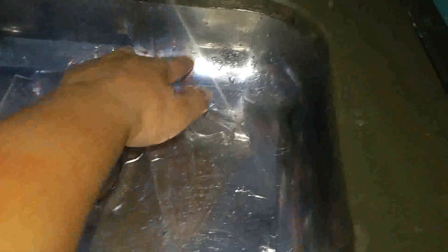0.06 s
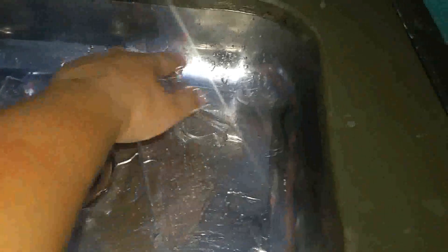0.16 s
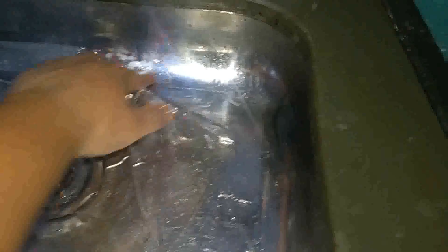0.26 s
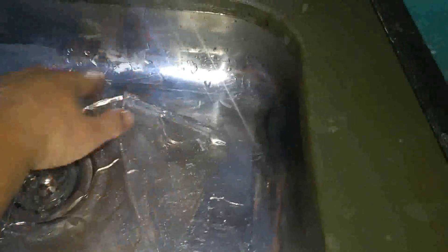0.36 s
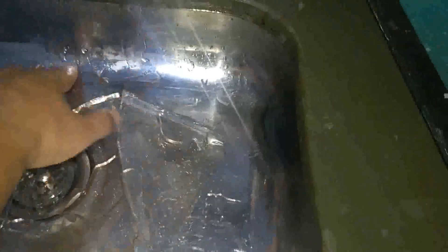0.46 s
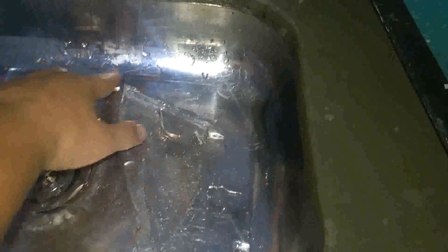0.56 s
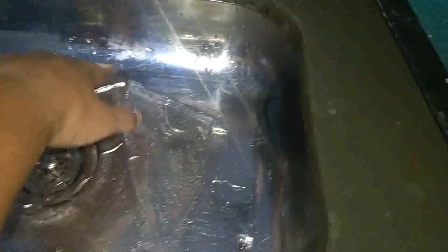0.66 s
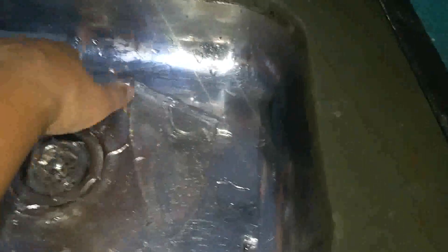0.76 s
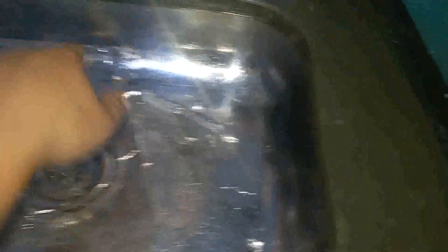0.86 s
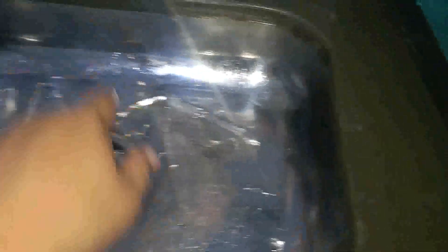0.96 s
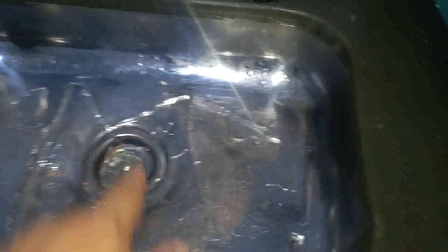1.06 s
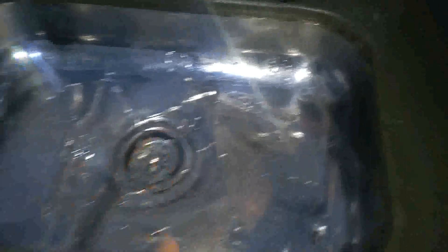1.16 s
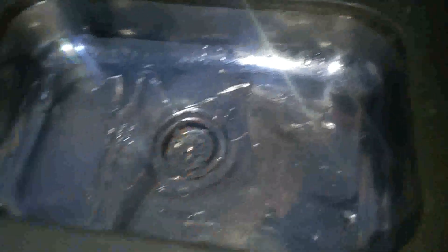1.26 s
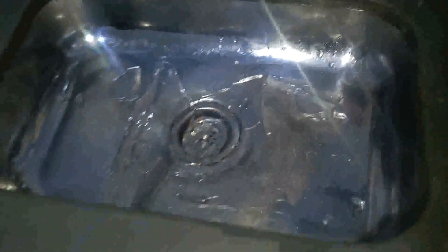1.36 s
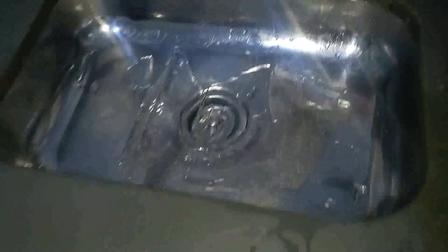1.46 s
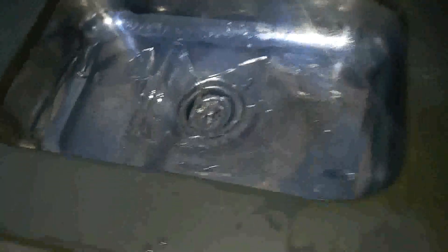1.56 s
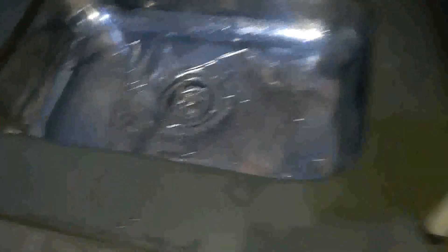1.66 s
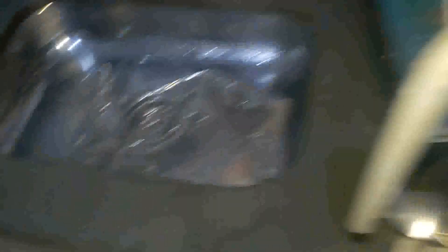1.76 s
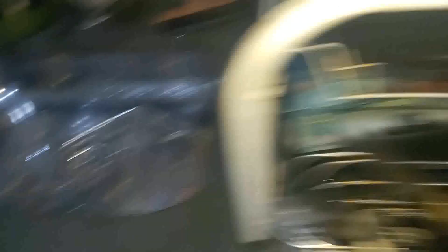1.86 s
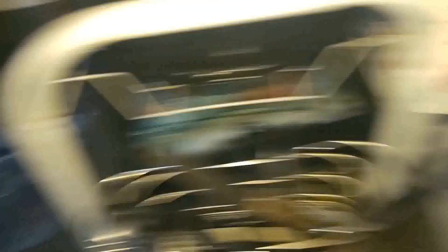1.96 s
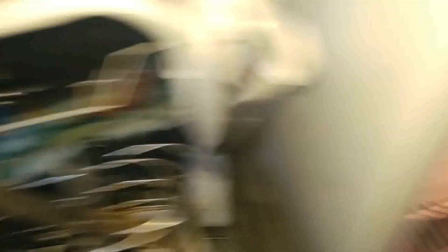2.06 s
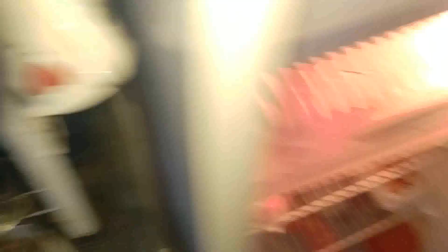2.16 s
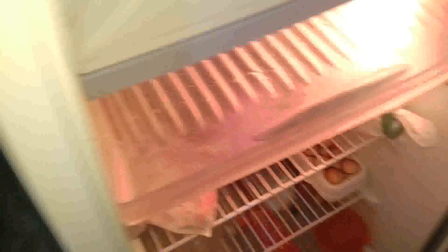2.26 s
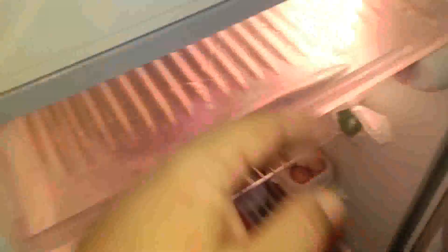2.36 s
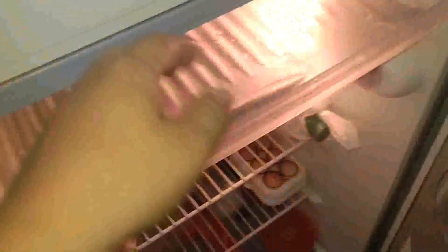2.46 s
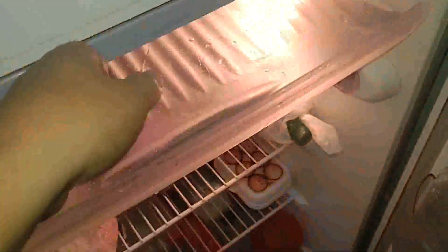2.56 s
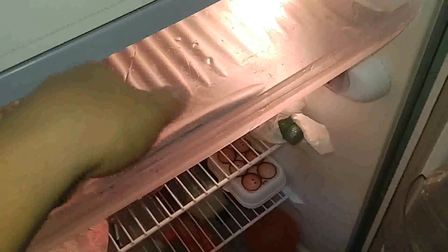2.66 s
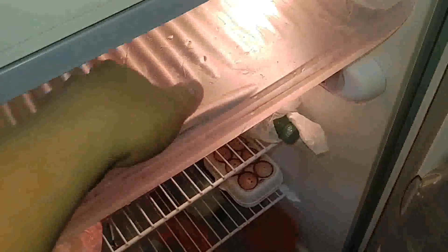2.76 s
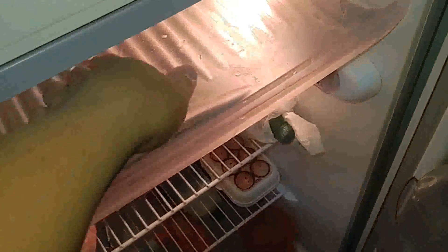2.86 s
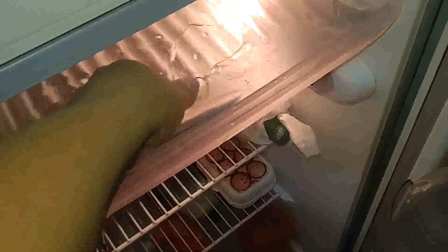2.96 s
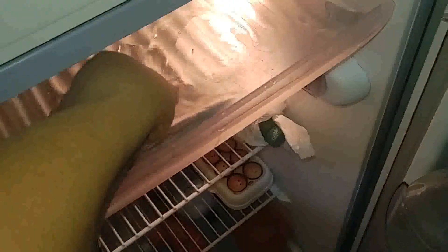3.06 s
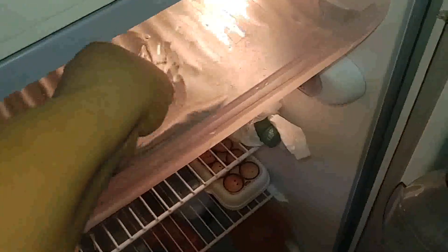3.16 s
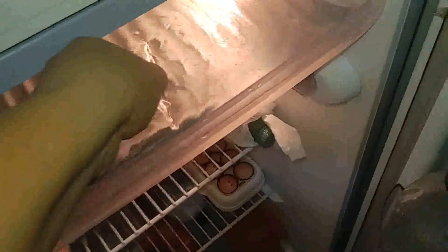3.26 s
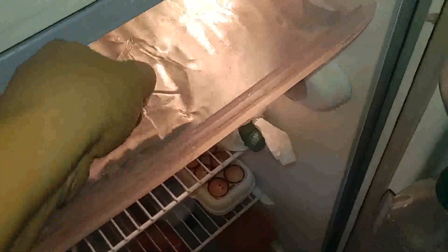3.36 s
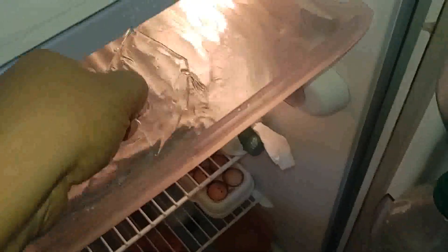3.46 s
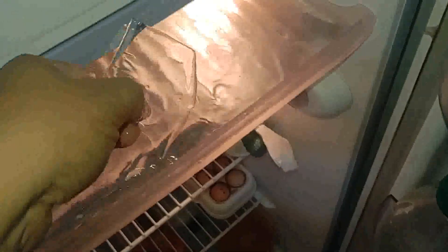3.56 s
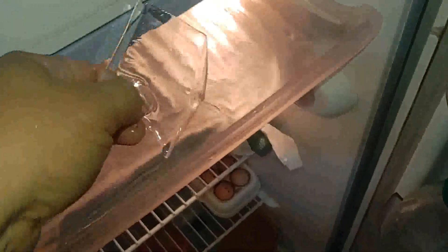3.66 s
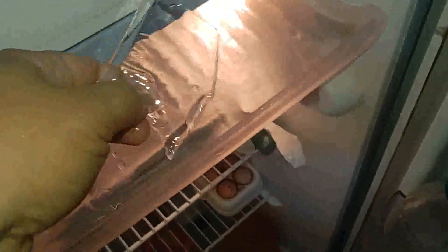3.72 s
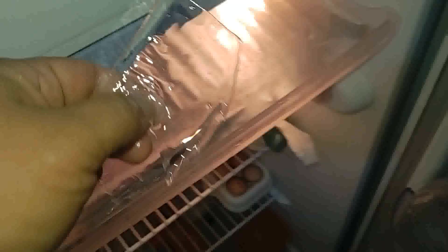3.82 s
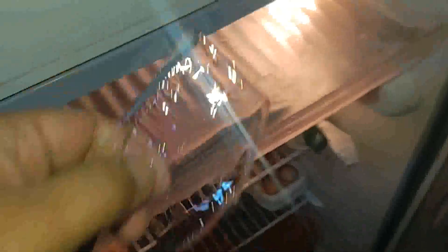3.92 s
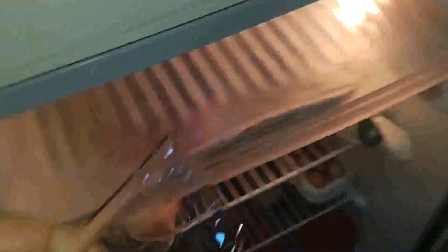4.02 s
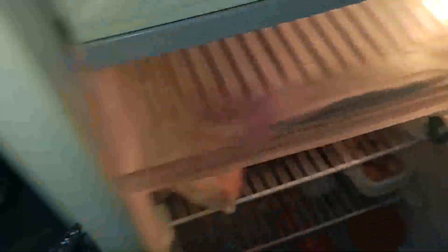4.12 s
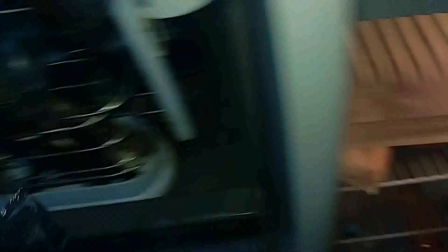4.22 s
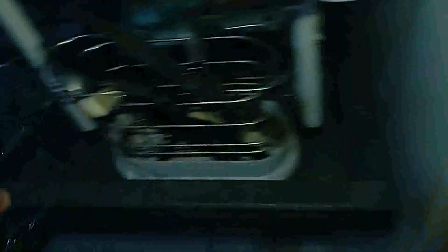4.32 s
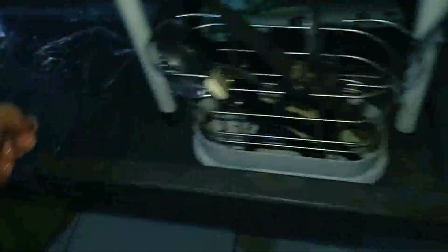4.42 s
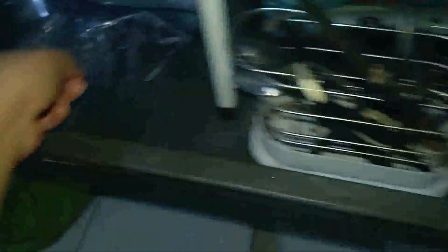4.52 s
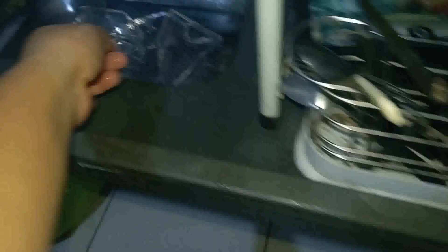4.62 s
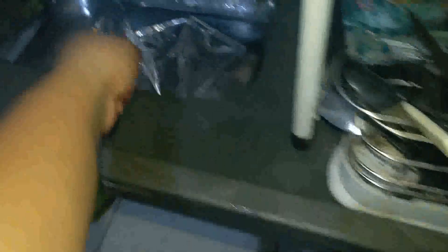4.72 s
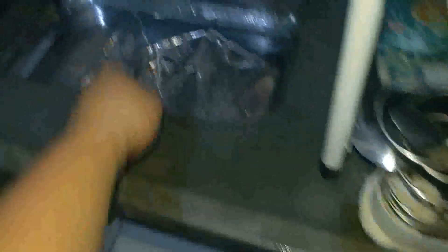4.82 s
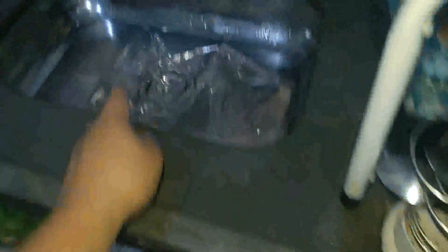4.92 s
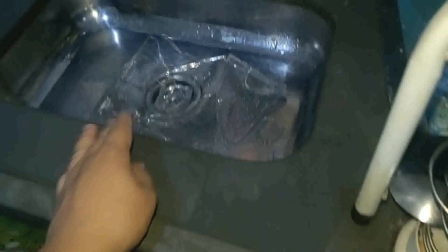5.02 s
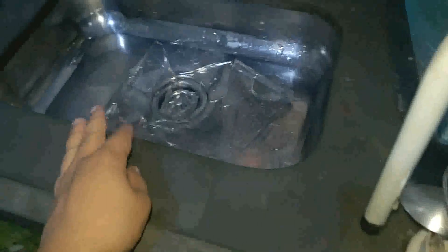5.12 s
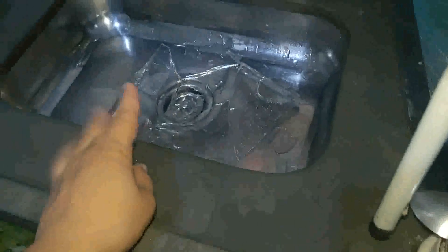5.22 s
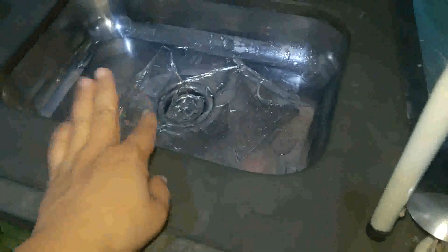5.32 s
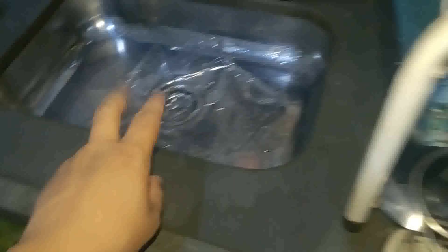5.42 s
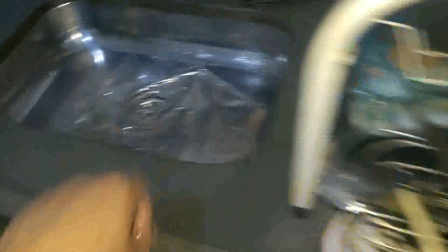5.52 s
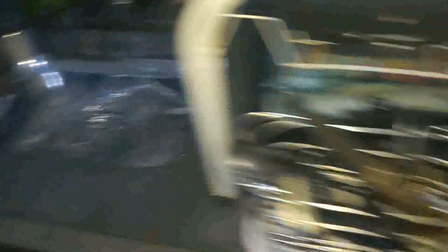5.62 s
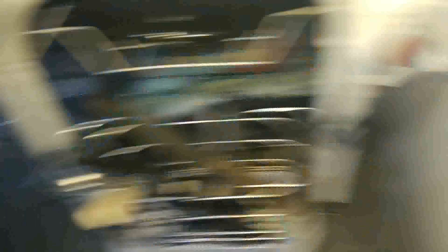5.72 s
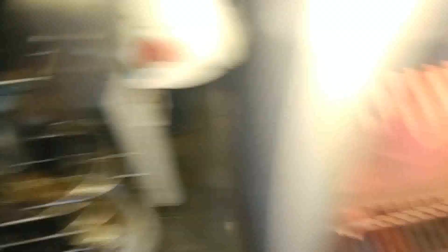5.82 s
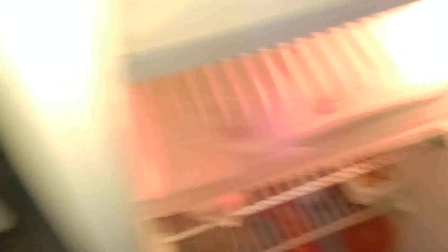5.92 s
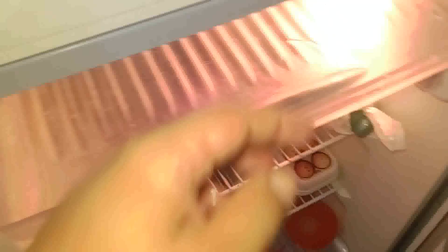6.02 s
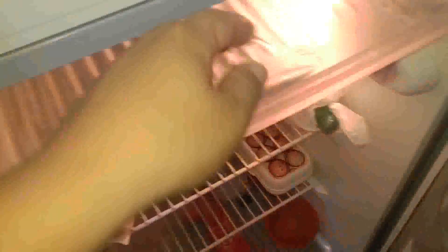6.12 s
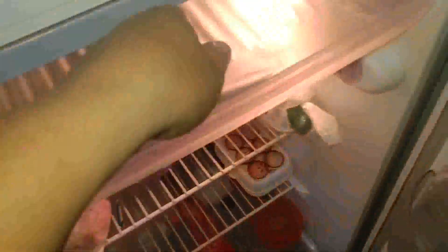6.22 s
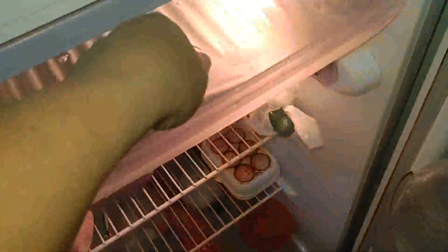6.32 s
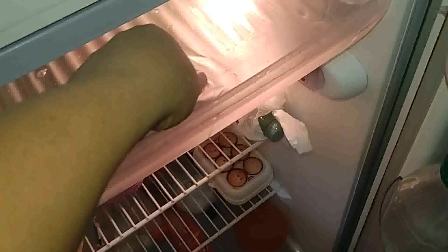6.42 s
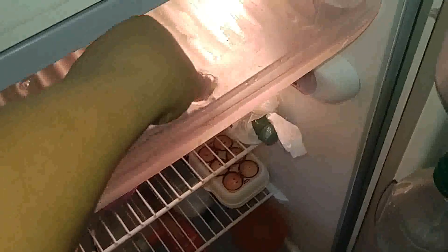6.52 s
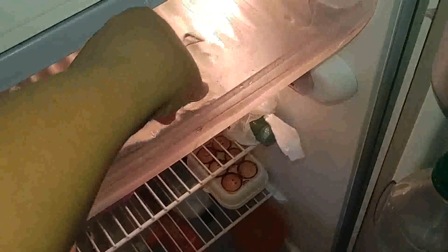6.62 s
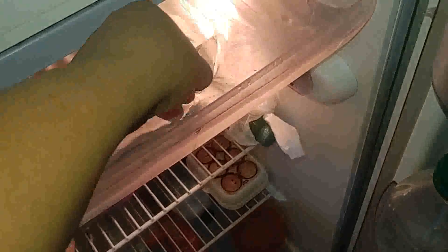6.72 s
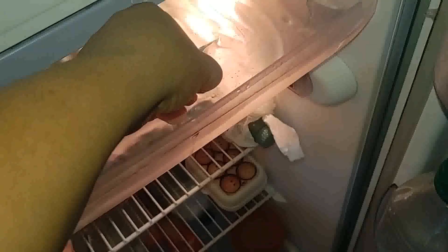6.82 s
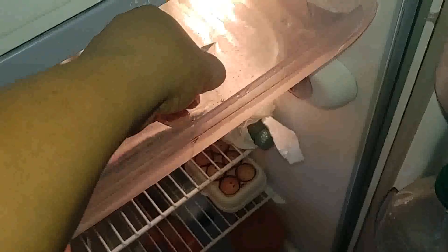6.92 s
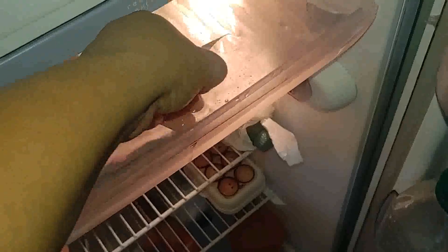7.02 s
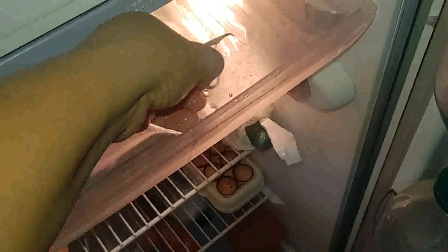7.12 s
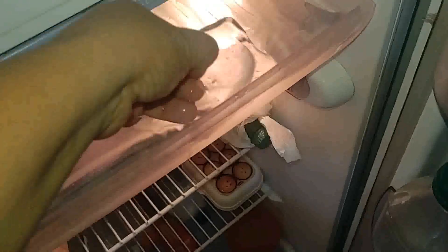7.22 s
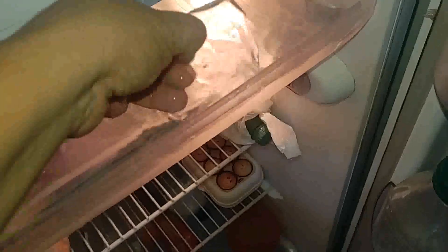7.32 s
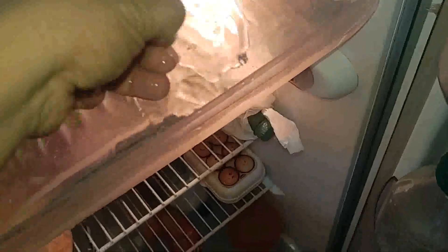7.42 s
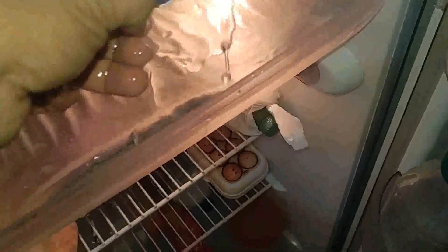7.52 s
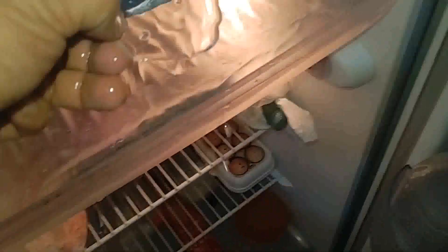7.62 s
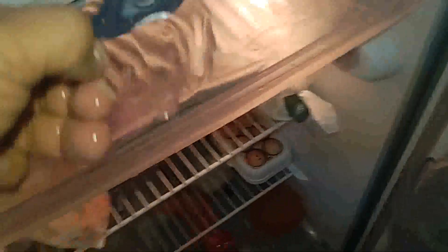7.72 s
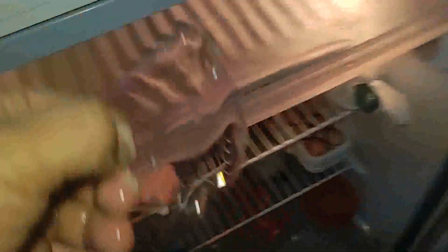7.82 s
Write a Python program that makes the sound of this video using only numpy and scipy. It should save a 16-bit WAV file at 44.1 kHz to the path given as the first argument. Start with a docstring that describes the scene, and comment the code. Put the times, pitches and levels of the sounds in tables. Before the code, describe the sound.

Close stereo pickup in a quiet kitchen with a faint refrigerator hum. Low thumps and short moans of ice in a metal basin, near silence, then small ticks, a hard snap and hollow knocks on a plastic tray. A sheet of ice smashes into the steel sink and skitters in pieces. Later a second sheet grinds over ribs with a squeal and scrapes out loudly, brighter toward the right.

```python
"""Sheets of ice are cleared by hand from a plastic freezer tray beside a steel sink in a small kitchen. Ice is
nudged about in the sink; a sheet cracks loose, lands there and shatters: decaying modes plus dense noise. A
second sheet is pried up and dragged out, its stick-slip noise growing louder and brighter with speed. Short
sagging tones give groans, thumps, throbs and low ringing; wet ice squeals as rough gliding tones. A
refrigerator hums as wavering sines over a thin hiss and a low rumble that swells at the start and end."""
import sys
import numpy as np
from scipy import signal
from scipy.fft import rfft, irfft, next_fast_len
from scipy.io import wavfile
from scipy.ndimage import map_coordinates

SR = 44100
rng = np.random.default_rng(int(sys.argv[2]) if len(sys.argv) > 2 else 0)


def bounce(signal):
    """Save signal as a 16-bit WAV file at the path given by the first command-line argument."""
    frames = np.transpose(np.atleast_2d(signal))
    limited = np.clip(frames, -1, 1)
    pcm = np.round(limited * 32767).astype(np.int16)
    wavfile.write(sys.argv[1], SR, pcm)


N = 347508


def amp(db):
    """Level definition: decibels become an amplitude ratio."""
    return 10 ** (np.asarray(db) / 20)


def evened(x):
    """Power normalisation: each channel is scaled to rms 1."""
    return x / np.sqrt(np.mean(x ** 2, axis=-1, keepdims=True) + 1e-20)


def read(points, hz):
    """Logarithmic frequency scale: a curve is interpolated along log f."""
    f, value = np.transpose(points)
    return np.interp(np.log(hz + 1), np.log(f), value)


def add(mix, s, sound):
    """Superposition: a stereo sound is summed in at time s, or at the start if s is negative."""
    part = mix[:, max(round(s * SR), 0):][:, :sound.shape[1]]
    part += sound[:, :part.shape[1]]


def drift(rate_hz):
    """Random fluctuation: straight lines join normal random values drawn rate_hz times a second."""
    knots = rng.standard_normal(2048)
    return np.interp(np.arange(N) / SR * rate_hz, np.arange(len(knots)), knots)


def swell(s, width_s):
    """Gaussian envelope: a smooth rise and fall around time s."""
    return np.exp(-((np.arange(N) / SR - s) / width_s) ** 2)


# likeness of the sound at the two microphones [f/Hz, correlation from -1 to 1; below 0 is read as 0]
LIKENESS = [(150, 1), (230, 0.8), (330, 0.87), (640, 0.5), (1400, -0.09), (3000, 0.0846), (12000, 0)]


def coloured(pair, spectrum):
    """Spectral shaping and coherence: two unrelated signals get one spectrum and a set likeness."""
    size = next_fast_len(pair.shape[1])
    hz = np.fft.rfftfreq(size, 1 / SR)
    first, second = rfft(pair, size)
    same = np.clip(read(LIKENESS, hz), 0, 1)
    right = same * first + np.sqrt(1 - same ** 2) * second
    shaped = np.array([first, right]) * amp(read(spectrum, hz))
    return evened(irfft(shaped, size)[:, :pair.shape[1]])


def struck(modes, rise_s):
    """Modal decay: each mode is a dying sine; the higher ones reach the two microphones out of step."""
    t = np.arange(SR * 3 // 4) / SR
    out = np.zeros((2, len(t)))
    for hz, db, t60 in modes:
        phase_gap = np.arccos(np.clip(read(LIKENESS, hz), 0, 1)) * np.array([[0], [1]])
        out += amp(db - 60 * t / t60) * np.sin(2 * np.pi * (hz * t + rng.random()) + phase_gap)
    return out * (1 - np.exp(-(t / rise_s) ** 2))


def slips(per_s, spread_db):
    """Stick-slip friction: grains of uneven size, each scattered by the surfaces around it."""
    size = amp(spread_db * np.minimum(rng.exponential(1, N), 3))
    size *= rng.random(N) < per_s / SR
    grains = size * rng.choice([-1, 1], N)
    t = np.arange(SR // 15) / SR
    scatter = rng.standard_normal((2, len(t))) * (np.exp(-t / 0.00041) + 0.26 * np.exp(-t / 0.013))
    return signal.oaconvolve(grains[None], scatter, axes=1)[:, :N]


def bent(pair, ratio):
    """Variable-rate reading: a changing ratio, taken relative to its mean, shifts all resonances."""
    at = np.cumsum(ratio / ratio.mean())
    return np.array([map_coordinates(x, [at], order=3, mode="mirror") for x in pair])


# partials of the refrigerator hum [f/Hz, level/dB before a lift of 3 dB]
HUM_PARTIALS = [(118.4, -69.5), (296.1, -72), (355.3, -80.5), (532.9, -85), (602.9, -83)]
# steady noise of the kitchen [f/Hz, relative level per Hz/dB]
AIR_SPECTRUM = [(25, -34.5), (60, -8.5), (120, -6.5), (200, -8.5), (330, -8), (450, -11.5), (600, -14.5),
                (900, -20), (1300, -21), (1800, -18), (2700, -19), (4200, -25), (6000, -22), (11000, -28.5),
                (15500, -36.5)]
# the low rumble [t/s, level/dB]
RUMBLE_LEVEL = [(0, -57), (1, -67.5), (6.5, -67.5), (7.1, -64.5), (7.88, -56.5)]
HISS_DB = -63


def kitchen():
    """Tonal and broadband noise: the compressor's wavering partials over a low rumble and a thin hiss."""
    t = np.arange(N) / SR
    hum = np.zeros(N)
    for hz, db in HUM_PARTIALS:
        level = amp(db + 3.0 + 0.88 * drift(3.7)) * np.sqrt(2)
        hum += level * np.sin(2 * np.pi * hz * t + 0.28 * drift(3.02))
    air = coloured(rng.standard_normal((2, N)), AIR_SPECTRUM)
    low = signal.sosfiltfilt(signal.butter(2, 700, fs=SR, output="sos"), air)
    times, levels_db = np.transpose(RUMBLE_LEVEL)
    rumble = amp(np.interp(t, times, levels_db) + 0.88 * drift(8.1)) * evened(low)
    return hum + rumble + amp(HISS_DB) * evened(air - low)


# groans and squeaks of wet ice, low ringing of the sink, thumps and throbs of the panels
# [t/s, duration/s, initial f/Hz, initial level/dB]
SHORT_TONES = [(-.05, 0.26, 123.4, -50), (0.172, 0.094, 650, -40.5), (0.403, 0.14, 428, -45),
               (.492, 0.068, 133, -41), (0.574, 0.13, 122, -48.5), (0.736, 0.11, 425, -61),
               (.82, 0.32, 126, -60), (.995, 0.035, 2670, -61.5), (2.636, .09, 87, -55),
               (3.79, 0.2, 132, -52.5), (6.73, 0.24, 178, -48), (6.704, .11, 255, -48.5)]
TONE_SAG, TONE_FADE_DB = 0.06, -12.5  # pitch (share) and level sink over each tone
TONE_WOBBLE, TONE_FLUTTER_DB = .022, 3.5  # unsteadiness of pitch (share) and of level


def short_tones():
    """Frequency and amplitude modulation: short tones sag and fade, unsteady in pitch and strength."""
    out = np.zeros((2, N))
    for s, length_s, hz, db in SHORT_TONES:
        n = round(length_s * SR)
        sinking = np.linspace(0, 1, n) ** 2
        pitch_hz = hz * (1 - TONE_SAG * sinking) * (1 + TONE_WOBBLE * drift(103)[:n])
        turns = np.cumsum(pitch_hz) / SR
        tone = np.sin(2 * np.pi * turns) + amp(-42.0) * np.sin(4 * np.pi * turns)
        level_db = db + TONE_FADE_DB * sinking + TONE_FLUTTER_DB * drift(130.7)[:n]
        tone *= np.sqrt(2) * amp(level_db) * signal.windows.tukey(n, .5)
        # a tone already under way at the start loses its beginning
        add(out, s, np.array([tone, tone])[:, max(-round(s * SR), 0):])
    return out


# wet ice squeals on the tray [t/s, duration/s, first f/Hz, last f/Hz, initial peak level/dB]
SQUEAKS = [(6.662, 0.054, 2560, 2390, -43.5), (7.212, .05, 2900, 3050, -58), (7.258, .065, 2400, 1950, -47)]
SQUEAK_RISE_SHARE, SQUEAK_FADE_DB = 0.16, -16  # share of the duration; fall over the whole of it
SQUEAK_ROUGH, SQUEAK_FLUTTER_DB, SQUEAK_SLIPS_PER_S = .035, 3, 500  # roughness is a share of pitch


def squeaks():
    """Frictional self-oscillation: a rough tone starts quickly and glides in pitch as it fades."""
    out = np.zeros((2, N))
    quarter_turn = np.array([[0], [1 / 4]])  # between left and right
    for s, length_s, from_hz, to_hz, db in SQUEAKS:
        n = round(length_s * SR)
        u = np.linspace(0, 1, n)
        glide_hz = to_hz + (from_hz - to_hz) * (1 - u) ** 2
        hz = glide_hz * (1 + SQUEAK_ROUGH * drift(SQUEAK_SLIPS_PER_S)[:n])
        flutter_db = SQUEAK_FLUTTER_DB * drift(SQUEAK_SLIPS_PER_S)[:n]
        level = amp(db + SQUEAK_FADE_DB * u + flutter_db)
        level *= np.minimum(u / SQUEAK_RISE_SHARE, 1) * np.minimum((1 - u) * 10, 1)
        add(out, s, level * np.sin(2 * np.pi * (np.cumsum(hz) / SR + quarter_turn)))
    return out


# the gripped sheet slides in short surges [t/s of top speed, rise and fall/s, speed level/dB]
SURGES = [(7.548, 0.004, -31.5), (7.616, 0.036, -23.5), (7.69, 0.04, -27), (7.73, .02, -27),
          (7.764, 0.017, -18.5)]
PULL_S, PULL_RISE_S = 7.735, 0.089  # start and time constant of the steady pull
# resonances of the rasp [f/Hz, relative level per Hz/dB]
RASP_SPECTRUM = [(60, -18), (150, -7), (450, -17), (600, -8), (850, -17), (1600, -14), (1850, -6),
                 (2080, 2.5), (2650, 1), (2950, -9), (3400, -15), (4300, -13), (4650, -2), (5300, -7),
                 (6500, -20), (8100, -13), (9200, -24), (15000, -40)]
RASP_DB, RASP_FULL_SPEED = -38, 0.129  # the rasp saturates beyond about this speed
RASP_GLIDE = .03  # its resonances rise by this share as it speeds up
RASP_WANDER, RASP_SHIFTS_PER_S = .025, 45
# the bright hiss of sliding [f/Hz, relative level per Hz/dB]
SWISH_SPECTRUM = [(300, -36), (480, -38), (600, -18), (780, -41), (1350, -37), (1520, -19), (1800, -22),
                  (2100, -11.5), (2800, -16), (3250, -27), (3800, -20), (4300, -13), (4700, 2), (5380, 2),
                  (6000, -2), (7300, -0.5), (8050, 3), (9200, -9), (11000, -9.5), (12000, -6.5),
                  (13000, -10.5), (15500, -12.5)]
SWISH_DB, SWISH_POWER = -16, 1.77  # the hiss grows with this power of speed
CRUNCH_DB, CRUNCHES_PER_S = -5, 260  # level relative to the hiss
# the wet sheet shifts in the grip [f/Hz, relative level per Hz/dB]
RUB_SPECTRUM = [(1200, -19), (1800, -10), (2150, -1), (2700, -5), (3300, -13), (8000, -19.5), (15000, -31)]
RUB_S, RUB_WIDTH_S, RUB_DB = 7.285, 0.065, -59.5
CATCH_DB, CATCHES_PER_S = .8, 120  # small random changes of level
DRAG_LEAN_DB = -5  # left minus right: the sheet passes close to the right microphone


def drag():
    """Speed-dependent friction: a faint rub in the grip, then a rasp and a hiss with crunching frost."""
    t = np.arange(N) / SR
    speed = sum(amp(db) * np.exp(-abs(t - s) / width_s) for s, width_s, db in SURGES)
    speed += 1 - np.exp(-np.maximum(t - PULL_S, 0) / PULL_RISE_S)
    grip = np.tanh(speed / RASP_FULL_SPEED)
    pitch_ratio = 1 + RASP_GLIDE * grip + RASP_WANDER * drift(RASP_SHIFTS_PER_S)
    rasp = bent(coloured(slips(450, 1.3), RASP_SPECTRUM), pitch_ratio)
    swish = coloured(slips(3500, 2.9), SWISH_SPECTRUM)
    swish += amp(CRUNCH_DB) * coloured(slips(CRUNCHES_PER_S, 1.5), SWISH_SPECTRUM)
    rub = swell(RUB_S, RUB_WIDTH_S) * coloured(slips(500, 2.8), RUB_SPECTRUM)
    out = amp(RASP_DB) * grip * rasp + amp(SWISH_DB) * speed ** SWISH_POWER * swish + amp(RUB_DB) * rub
    return out * amp(CATCH_DB * drift(CATCHES_PER_S)) * amp([[DRAG_LEAN_DB / 2], [-DRAG_LEAN_DB / 2]])


# the grinding that runs through the judders [f/Hz, relative level per Hz/dB]
GRIND_SPECTRUM = [(80, -10), (250, 1), (600, -1), (720, -5), (870, 1), (1100, -5), (1400, -3), (1900, -10),
                  (2700, -6), (3300, -16), (5000, -22), (15000, -34)]
GRIND_S, GRIND_RISE_S, GRIND_HOLD_S = 6.664, 0.0074, 0.093  # the hold includes the rise
GRIND_DB, GRIND_FADE_DB_PER_S = -48.5, 110


def grind():
    """Continuous friction: between its judders the sheet grinds over the ribs of the tray."""
    t = np.arange(N) / SR - GRIND_S
    fade_db = GRIND_FADE_DB_PER_S * np.maximum(t - GRIND_HOLD_S, 0)
    level = np.clip(t / GRIND_RISE_S, 0, 1) * amp(GRIND_DB - fade_db)
    return level * coloured(slips(1500, 2.7), GRIND_SPECTRUM)


# shards skid in the basin [t/s of top speed, rise and fall/s, top level/dB]
SKIDS = [(5.275, 0.027, -36.5), (5.5, 0.29, -59.5)]
# their spectrum [f/Hz, relative level per Hz/dB]
SKID_SPECTRUM = [(500, -20), (1500, -11.5), (2800, -2.5), (4200, -3), (7000, 0), (10000, -5), (15000, -16)]


def skids():
    """Sliding friction: shards skitter over the wet steel after the break, and one glides on."""
    level = sum(amp(db) * swell(s, width_s) for s, width_s, db in SKIDS)
    return level * coloured(slips(900, 3.0), SKID_SPECTRUM)


# pieces that ring when struck [t/s, lowest mode f/Hz, level/dB before the mode's own, its T60/s]
PIECES = [(.577, 2005, -43, 0.06), (.651, 2055, -49, 0.07), (4.903, 482, -28.5, 0.15),
          (5.101, 2125, -26, 0.073), (5.153, 642, -29, 0.15), (5.219, 426, -25, 0.081),
          (6.811, 2760, -59, 0.089)]
# modes of a loose plate of ice [multiple of its lowest f, relative level/dB]
PLATE_MODES = [(1, 1.5), (1.35, -1.5), (1.58, -3), (2.1, -14.5), (2.63, -6.5)]
PLATE_DAMPING, PLATE_RISE_CYCLES = 0.41, 3.17  # damping: T60 falls with this power of the multiple


def pieces():
    """Plate vibration: loose ice rings at the pitch of its size; the higher modes die sooner."""
    out = np.zeros((2, N))
    for s, hz, db, t60 in PIECES:
        modes = [(hz * ratio, db + mode_db, t60 / ratio ** PLATE_DAMPING) for ratio, mode_db in PLATE_MODES]
        add(out, s, struck(modes, rise_s=PLATE_RISE_CYCLES / hz))
    return out


def ringing(colour, decay, direct_db, direct_s):
    """Impulse response: a body answers a tap with a short direct burst and dense dying resonances."""
    t = np.arange(SR * 3 // 4) / SR
    noise = coloured(rng.standard_normal((2, len(t))), colour)
    hz, at, z = signal.stft(noise, SR, nperseg=256)
    dying = z * amp(-60 * at / read(decay, hz)[:, None])
    dense = signal.istft(dying, SR, nperseg=256)[1][:, :len(t)]
    # the direct burst is mostly treble: the big panels need time to swing
    treble = signal.sosfilt(signal.butter(1, 1500, "high", fs=SR, output="sos"), dense)
    return dense + amp(direct_db) * treble * np.exp(-(t / direct_s) ** 2)


def chatter(build_s, length_s, per_s, strength):
    """Random microfracture: tiny clicks build up to the main contact and die away; total energy is 1."""
    t = np.arange(SR // 8) / SR
    envelope = np.where(t < build_s, t / build_s, np.exp(-abs(t - build_s) / length_s))
    clicks = strength * envelope * rng.standard_normal(len(t)) * (rng.random(len(t)) < per_s / SR)
    clicks[round(build_s * SR)] = 1
    return clicks / np.linalg.norm(clicks)


HARD_FROM_HZ = 1620  # the hardness of a contact tilts the spectrum above about this


def tilted(sound, hardness_db):
    """Contact stiffness: the treble is tilted by so many dB per octave."""
    size = next_fast_len(sound.shape[1] + 2048)
    octaves = np.log2(np.hypot(1, np.fft.rfftfreq(size, 1 / SR) / HARD_FROM_HZ))
    return irfft(rfft(sound, size) * amp(hardness_db * octaves), size)[:, :sound.shape[1]]


BUILD_S, BUILD_AT_CHATTER_S = 0.0052, .01  # build-up grows with the square root of the chatter time
THUD_LOW_SHARE = .11  # a thud reaches down to this share of its top frequency
HARDNESS_PER_OCTAVE_DB = 9  # so much more hardness lifts the lower edge of a crack by an octave


def blows(contacts, body, modes, modes_db, spread, dryness, per_s, strength, crack_hz):
    """Impact excitation: chatter drives a body; weight gives a low thud, hardness a bright crack."""
    out = np.zeros((2, N))
    heaviest_db = max(row[2] for row in contacts)
    loudest_db = max(max(row[2], row[4]) for row in contacts)
    for s, length_s, thud_db, thud_hz, crack_db, hardness_db in contacts:
        build_s = BUILD_S * np.sqrt(length_s / BUILD_AT_CHATTER_S)
        # a heavy thud sets the whole body ringing; a light one stays local
        modes_gain = amp(modes_db + spread * (thud_db - heaviest_db))
        sound = modes_gain * struck(modes, build_s + 0.24 * length_s)
        # faint ticks hardly pass into the body, so their direct burst stands out
        answer = body(dryness * (loudest_db - max(thud_db, crack_db)))
        clicks = chatter(build_s, length_s, per_s, strength)
        sound += signal.fftconvolve(answer, clicks[None], axes=1)[:, :sound.shape[1]]
        thud_band = [THUD_LOW_SHARE * thud_hz, thud_hz]
        thud = signal.sosfilt(signal.butter(3, thud_band, "band", fs=SR, output="sos"), sound)
        edge_hz = crack_hz * 2 ** (hardness_db / HARDNESS_PER_OCTAVE_DB)
        crack_filter = signal.butter(2, edge_hz, "high", fs=SR, output="sos")
        crack = signal.sosfilt(crack_filter, tilted(sound, hardness_db))
        for part, db in (thud, thud_db), (crack, crack_db):
            # levels hold for the first 50 ms
            add(out, s - build_s, amp(db) * part / part[:, :SR // 20].std())
    return out


# plastic tray and cabinet [f/Hz, relative level/dB, T60/s]
TRAY_MODES = [(105, -3, 0.29), (151.5, -20, 0.55), (177.6, -3.5, 0.5), (249.4, -6, 0.26), (320, -6, 0.12),
              (444, 3.5, 0.31), (518, 3, 0.33), (637, -9, 0.25), (860, 12, 0.16), (1010, 2.5, 0.32),
              (1002, -4, 0.4), (2450, 10, 0.048)]
# dense resonances of ice on the tray [f/Hz, relative level per Hz/dB]
TRAY_COLOUR = [(50, -10), (120, -10), (400, 6), (900, 2.5), (1400, 4), (2000, 4.5), (2900, 7), (3500, 0),
               (4100, -3), (6000, -4.5), (8500, -16.5), (15500, -31)]
# their decay [f/Hz, T60/s]
TRAY_DECAY = [(100, 1), (500, 0.18), (1200, 0.39), (2900, 0.14), (3600, 0.14), (6000, 0.2), (15000, 0.19)]
# cracks and knocks of the ice in the tray
# [t/s, chatter/s, thud level/dB, thud top f/Hz, crack level/dB, hardness/dB per octave]
TRAY_CRACKS = [(2.623, .002, -78, 380, -62, 5), (2.646, 0.0067, -56.5, 285, -67, 3),
               (2.962, 0.005, -64, 375, -63.5, -13), (3.039, 0.0016, -69, 380, -73, -4),
               (3.170, .002, -58, 900, -60.5, 4), (3.19, 0.028, -53, 516, -73, -19),
               (3.24, 0.041, -59.5, 380, -77, -15), (3.312, .017, -61.5, 386, -58.5, 13),
               (3.395, 0.032, -65, 380, -60, 3.5), (3.458, 0.0018, -59.5, 380, -33.5, 11.5),
               (3.615, 0.0072, -65.5, 380, -65, 10), (3.768, 0.0045, -42, 840, -36, -5.5),
               (3.79, 0.029, -48.5, 1000, -42, -16), (3.838, 0.024, -44, 540, -52.5, -13),
               (3.888, 0.006, -51.5, 480, -62, -14), (4.169, .01, -68.5, 382, -58.5, 4),
               (6.562, 0.008, -68, 383, -62.5, -6.5), (7.535, .0007, -74, 380, -56.5, 14),
               (7.545, 0.00081, -73, 380, -56.5, 15)]
# the second sheet gives way and judders along the tray in uneven slips
# [t/s, chatter/s, thud level/dB, thud top f/Hz, crack level/dB, hardness/dB per octave]
TRAY_JUDDERS = [(6.668, 0.008, -52, 890, -57.5, 0), (6.686, 0.011, -45.5, 695, -54, -17),
                (6.712, 0.0041, -44.5, 484, -64, -8), (6.743, 0.0058, -45.5, 520, -60, -8),
                (6.759, 0.0021, -44.5, 380, -63, -20), (6.809, 0.006, -47.5, 400, -56.5, -17),
                (6.857, 0.003, -49, 308, -62, -18)]


def tray():
    """Fracture and coupled bodies: ice cracks off the plastic tray, which knocks against the cabinet."""
    def body(dry_db):
        return ringing(TRAY_COLOUR, TRAY_DECAY, direct_db=dry_db + 9.0, direct_s=0.01)
    return blows(TRAY_CRACKS + TRAY_JUDDERS, body, TRAY_MODES, modes_db=-8.5, spread=0.51,
                 dryness=0.021, per_s=1700, strength=1.0, crack_hz=640)


# steel basin [f/Hz, relative level/dB, T60/s]
SINK_MODES = [(117.2, -15, 1.6), (173.3, -12.5, 0.4), (225, -7, 0.29), (262, -7, 0.12), (383, -4, 0.16),
              (411.1, -6.5, 0.35), (470, -5, 0.33), (602, -2, 0.25), (647, -3, 0.21), (780, -9, 0.3),
              (875.5, -6, 0.53), (983, -1.5, 0.22), (1102, -10.5, 0.4), (1312, -1.5, 0.39),
              (1410, -13.5, 0.24), (1860, -7, 0.22), (1954, -6.5, 0.34), (2190, -5, 0.23), (2241, -9, 0.28),
              (2479, -6.5, 0.29), (2650, -7, 0.4), (2707, -5, 0.25), (4320, -19, 0.16)]
# dense resonances of ice on the basin [f/Hz, relative level per Hz/dB]
SINK_COLOUR = [(50, -8.5), (110, -0.5), (220, 0), (600, 5.5), (1000, 12), (1400, 5.5), (1650, 5),
               (2200, 5.5), (2800, 8), (3100, 1), (3650, -1), (4400, 0), (7200, -5), (8100, -5),
               (11000, -12), (15500, -17)]
# their decay [f/Hz, T60/s]
SINK_DECAY = [(100, 0.26), (500, 0.26), (1300, 0.29), (2800, 0.27), (3400, 0.22), (7000, 0.25),
              (15000, .17)]
# ice in the sink is nudged, then a sheet lands, breaks and clatters
# [t/s, chatter/s, thud level/dB, thud top f/Hz, crack level/dB, hardness/dB per octave]
SINK_KNOCKS = [(0.178, 0.00058, -40.5, 483, -45, 3), (0.463, 0.019, -48.5, 400, -63, -4),
               (0.508, 0.0059, -47.5, 275, -61, 3), (0.552, 0.0037, -46.5, 680, -53, -10),
               (0.576, 0.003, -46.5, 460, -46, 0.5), (0.650, 0.003, -62, 410, -55.5, -0.5),
               (0.743, 0.007, -60, 410, -77, 9), (4.896, 0.0078, -25, 1210, -18.5, 0.5),
               (4.912, 0.011, -28.5, 930, -28, -5), (4.932, 0.012, -30, 700, -28.5, -1.5),
               (4.968, 0.005, -31, 920, -24.5, 0), (5.100, 0.007, -36.5, 1000, -17.5, 9),
               (5.111, .001, -42, 1020, -24.5, 10), (5.123, .002, -36, 1100, -27.5, 6.5),
               (5.131, 0.00094, -43, 1010, -31, 8), (5.154, 0.00417, -35, 1020, -34.5, 4.5),
               (5.164, 0.0019, -38, 1080, -26, 5), (5.172, .001, -41, 1000, -34.5, 5.5),
               (5.184, .002, -42, 895, -36, 4), (5.213, 0.002, -37.5, 1119, -23.5, 9.5),
               (5.233, 0.0041, -40.5, 580, -33, 8), (5.262, 0.00198, -56, 920, -39.5, 6.5),
               (5.285, 0.002, -58, 500, -42.5, 6.5), (5.487, 0.008, -57.5, 900, -35, 8)]
# the whole sheet rings once as it lands [f/Hz, level/dB, T60/s]
SHEET_MODES = [(1345, -11.5, 0.075), (2220, -19, 0.07), (2620, -12, 0.061), (2720, -6, 0.053),
               (4200, -12, 0.039)]
LANDING_S = 4.893
# the floor of the basin then booms under the weight [f/Hz, level/dB, T60/s]
BOOM_MODES = [(225.5, -23.5, .5)]
BOOM_S, BOOM_RISE_S = 4.908, .016


def sink():
    """Impact on a resonant shell: ice knocks, lands and shatters in the steel basin."""
    def body(dry_db):
        return ringing(SINK_COLOUR, SINK_DECAY, direct_db=dry_db - 1.5, direct_s=0.0019)
    out = blows(SINK_KNOCKS, body, SINK_MODES, modes_db=-8.0, spread=0.41,
                dryness=0.55, per_s=1900, strength=0.61, crack_hz=544)
    add(out, LANDING_S, struck(SHEET_MODES, rise_s=0.0021))
    add(out, BOOM_S, struck(BOOM_MODES, rise_s=BOOM_RISE_S))
    return out


def scene():
    """Superposition: room, tray and sink sound together."""
    ice_on_tray = squeaks() + drag() + grind() + tray()
    return kitchen() + short_tones() + ice_on_tray + skids() + pieces() + sink()


# balance of the two microphones [f/Hz, left minus right level/dB]
LEAN = [(500, 1.5), (1300, -1), (2400, -7), (3900, -1.5), (7000, -2.5), (11500, -6), (15000, -0.5)]
OVERLOAD = .85  # peaks that near this share of full scale are rounded off
EDGE_HZ = 15950  # band limit


def record(dry):
    """Transduction: the right microphone hears more treble; peaks saturate; then the band is limited."""
    size = next_fast_len(N + 4096)
    lean_db = read(LEAN, np.fft.rfftfreq(size, 1 / SR))
    ports = amp(np.array([lean_db, -lean_db]) / 2)
    balance = ports / np.sqrt((ports ** 2).mean(0))  # the mean squared gain of the two stays 1
    heard = irfft(rfft(dry, size) * balance, size)[:, :N]
    heard = OVERLOAD * np.tanh(heard / OVERLOAD)
    lowpass = signal.firwin(511, EDGE_HZ, window=("kaiser", 9), fs=SR)
    return signal.oaconvolve(heard, lowpass[None], "same")


dry = scene()
out = record(dry)
bounce(out)
```